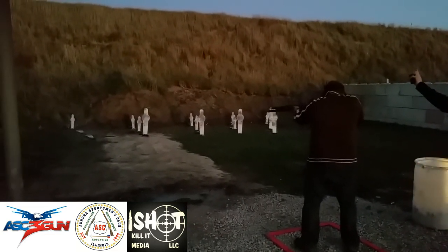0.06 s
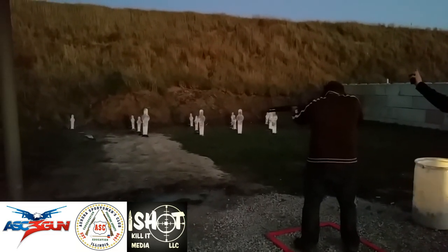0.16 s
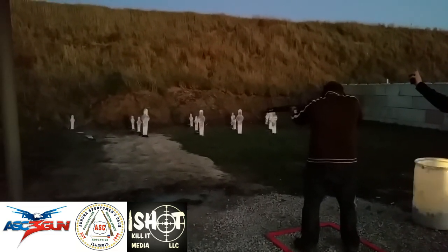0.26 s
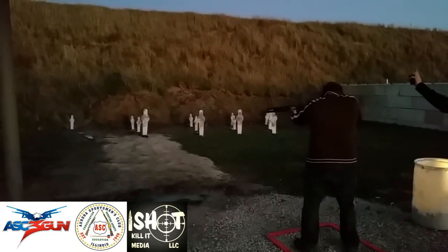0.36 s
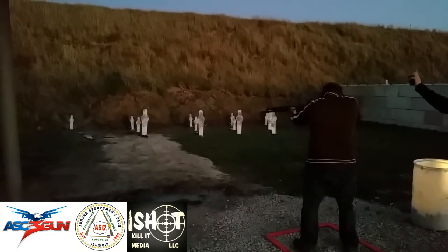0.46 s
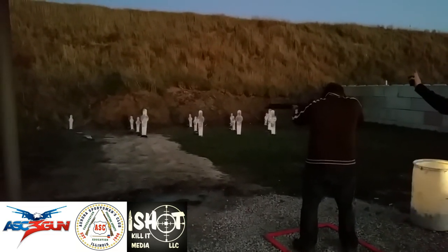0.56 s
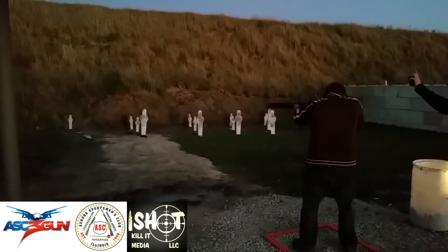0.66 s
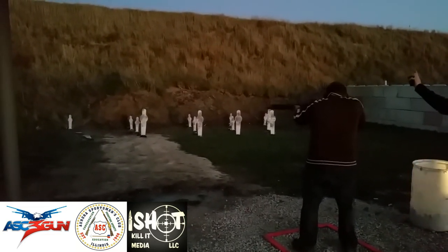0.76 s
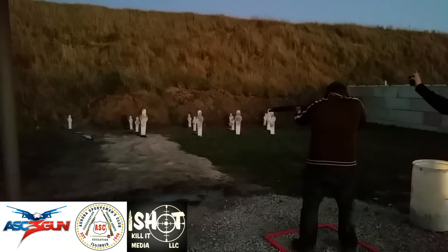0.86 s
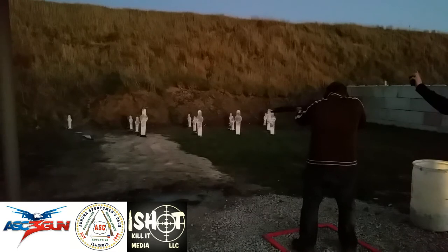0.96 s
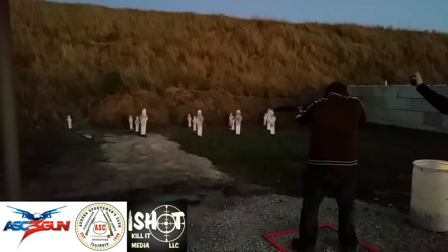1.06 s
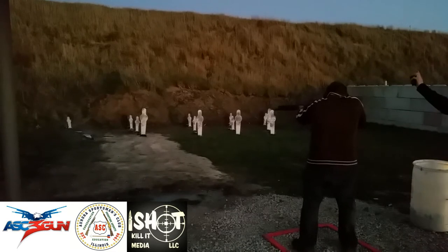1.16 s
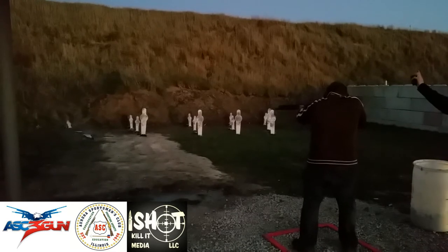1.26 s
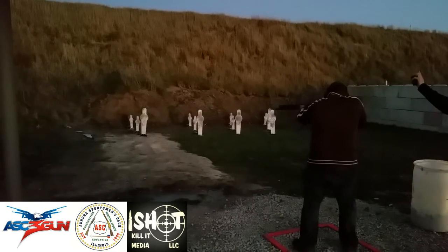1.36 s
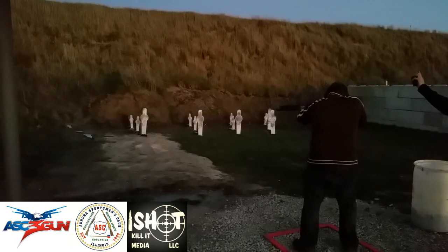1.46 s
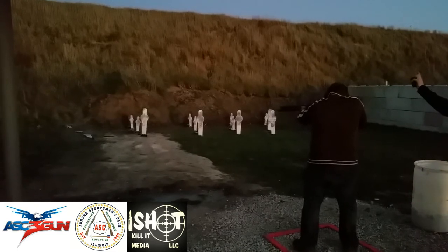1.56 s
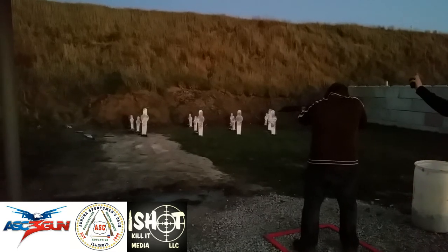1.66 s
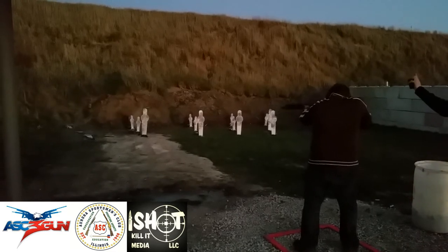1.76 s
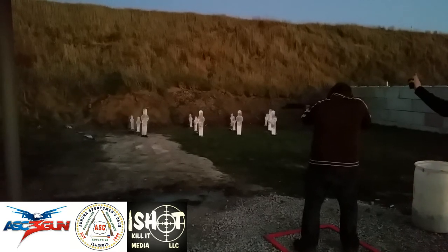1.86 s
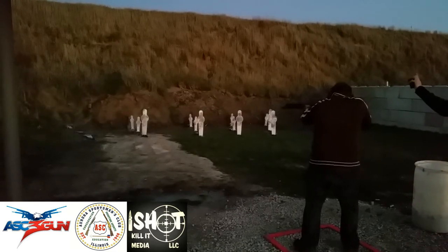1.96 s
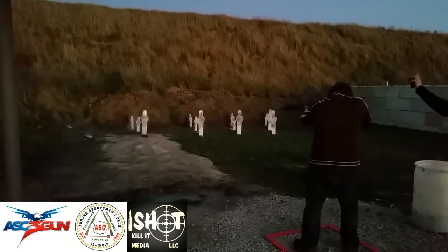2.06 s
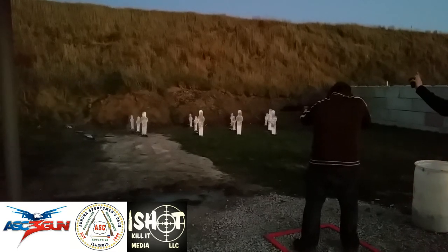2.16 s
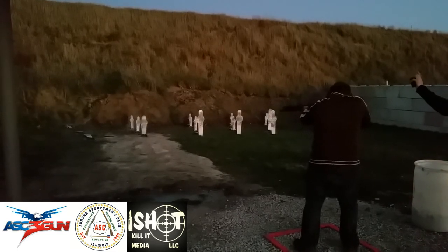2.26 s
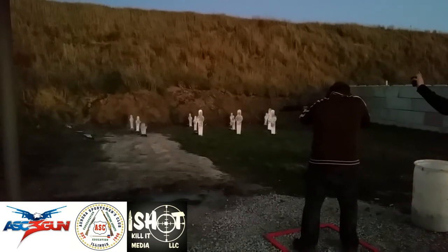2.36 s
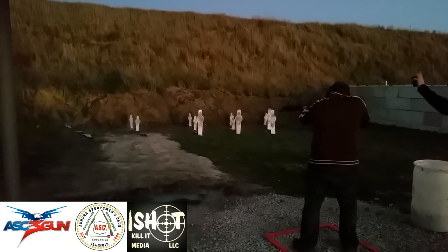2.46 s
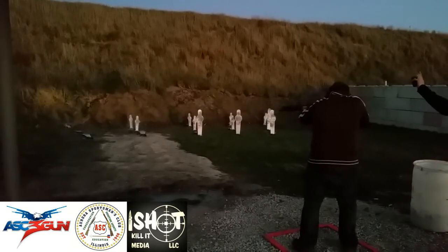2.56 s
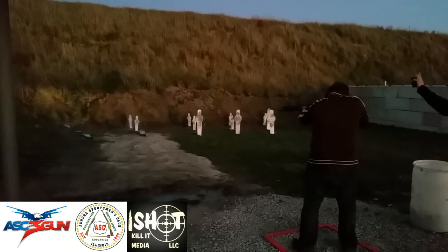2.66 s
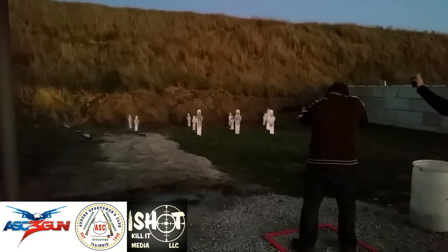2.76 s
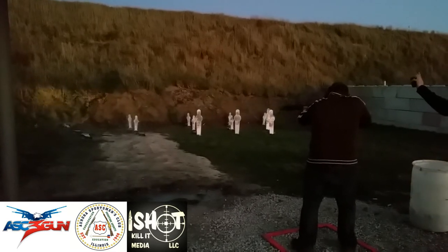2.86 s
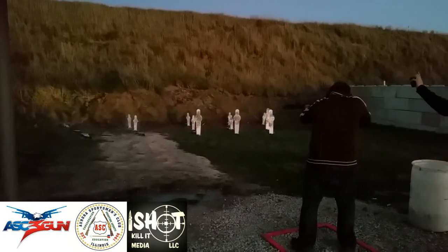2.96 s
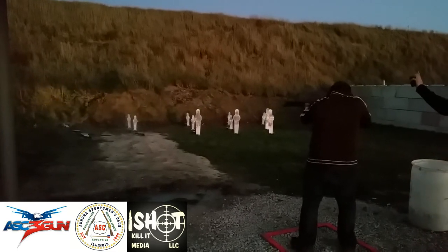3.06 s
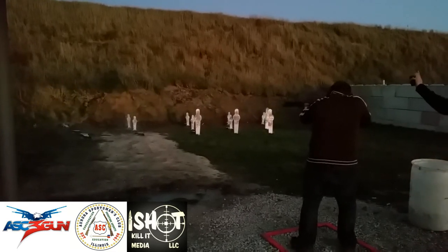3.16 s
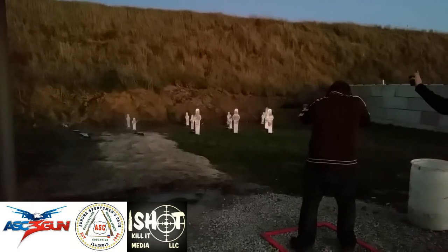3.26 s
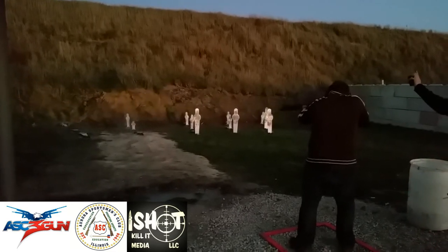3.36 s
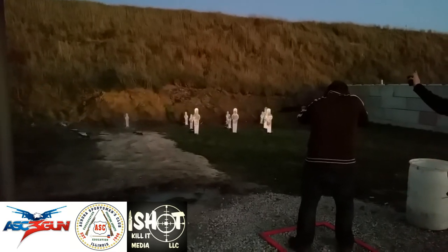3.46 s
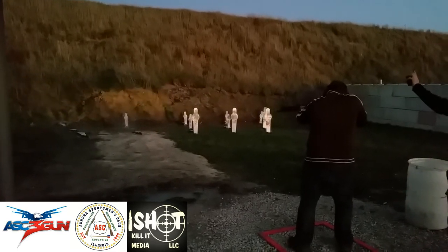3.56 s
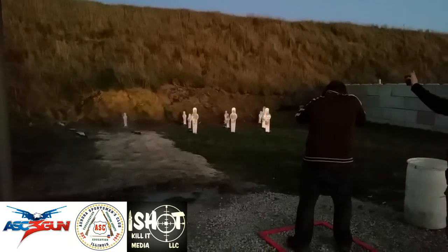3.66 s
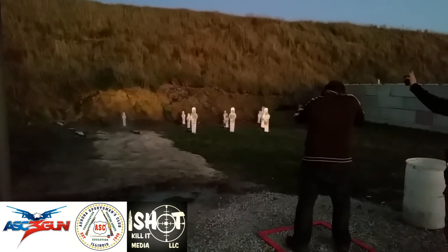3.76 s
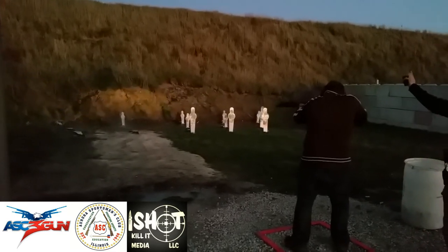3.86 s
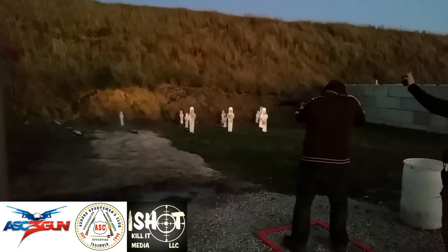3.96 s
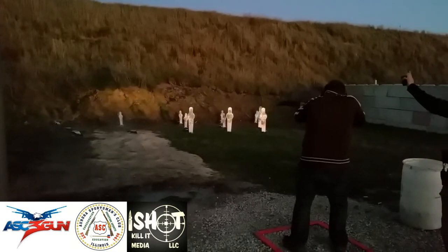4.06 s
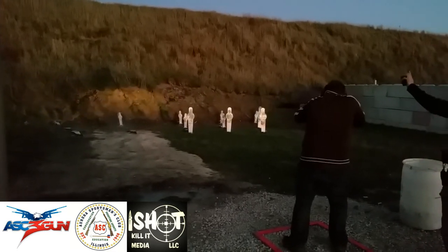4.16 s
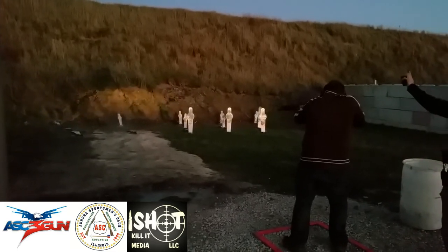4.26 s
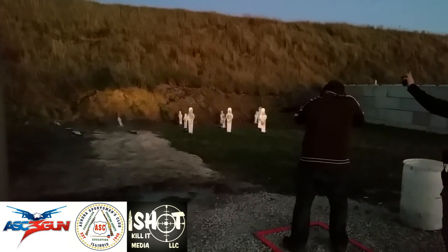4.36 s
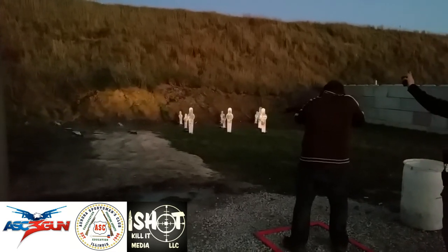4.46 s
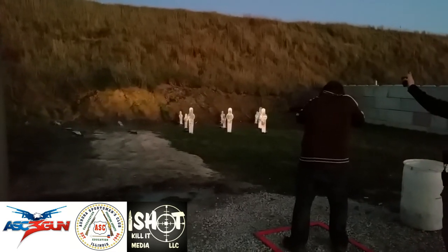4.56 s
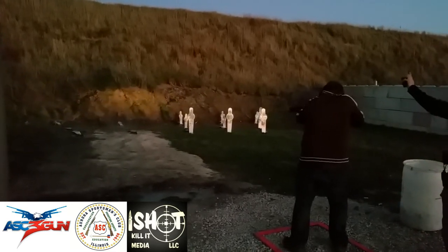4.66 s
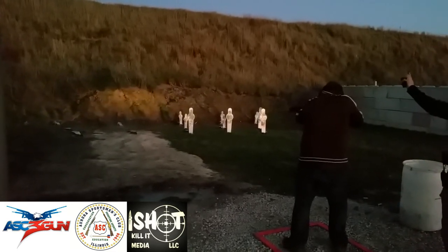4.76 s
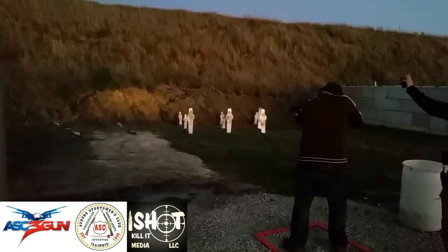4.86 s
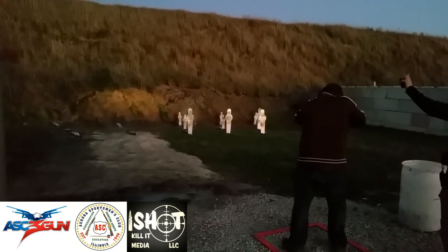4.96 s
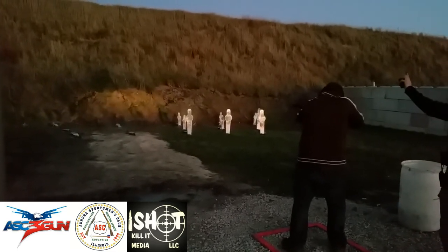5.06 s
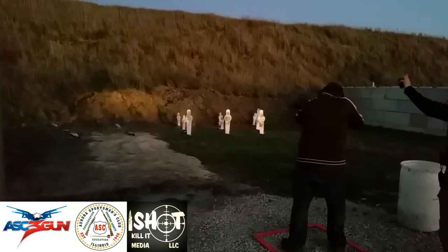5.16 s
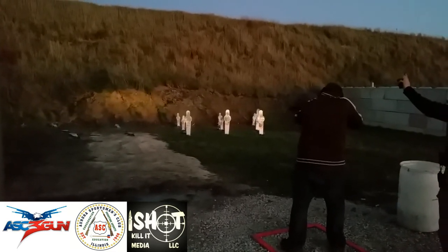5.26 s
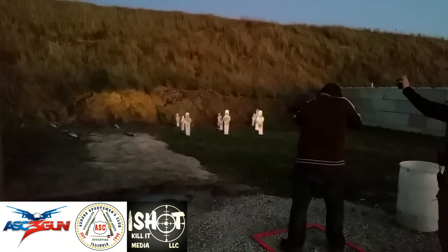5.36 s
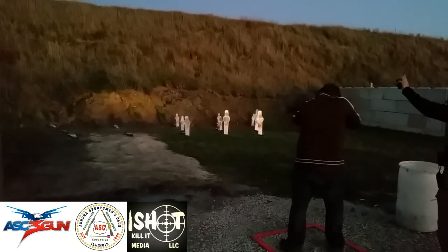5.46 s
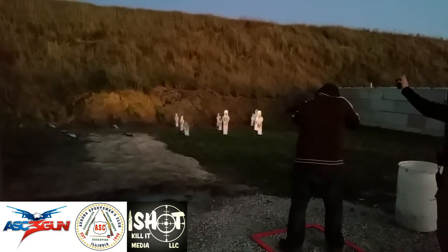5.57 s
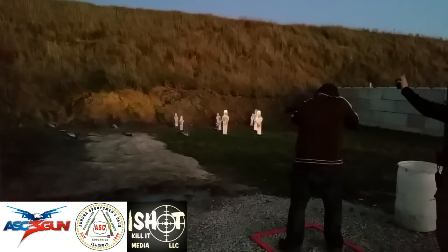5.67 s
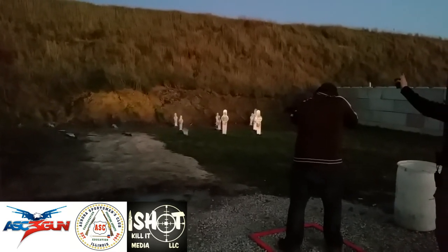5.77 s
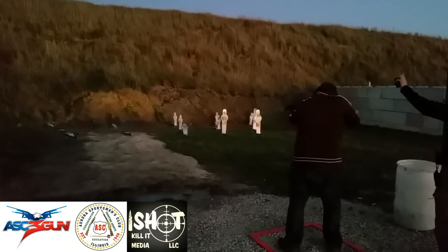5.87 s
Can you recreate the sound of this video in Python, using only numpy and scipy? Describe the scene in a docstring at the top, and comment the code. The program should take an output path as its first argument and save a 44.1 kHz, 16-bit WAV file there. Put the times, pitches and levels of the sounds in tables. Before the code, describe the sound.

Five heavy, evenly spaced shotgun blasts crack and roar between earth banks outdoors, steel targets clanking as they topple, over faint hiss and engine drone.

```python
"""Outdoor hiss and a small engine's drone are heard first, with steel clanking; both swell before the first shot.
A semi-automatic shotgun then fires five times in a bay between earth banks and a block wall.
Each blast is an oscillating pressure pulse followed by a roar of scattered reflections, treble returns and slaps.
Steel plates topple and clank as decaying modes; the hiss is coloured noise and the drone a harmonic series."""
import sys
import numpy as np
from scipy import signal
from scipy.io import wavfile
from scipy.ndimage import uniform_filter1d

SR = 44100
rng = np.random.default_rng(int(sys.argv[2]) if len(sys.argv) > 2 else 0)


def dump(signal):
    """Clip the signal to [-1, 1] and save it as 16-bit WAV at the path in sys.argv[1]."""
    limited = np.clip(np.atleast_2d(signal).T, -1, 1)
    pcm = np.round(limited * 32767).astype(np.int16)
    wavfile.write(sys.argv[1], SR, pcm)


N = 261513  # samples

# Likeness of the two channels in reflected sound. Each row: frequency in Hz, shared part from -1 to 1.
REFLECTED_SAME = [(60, 0.54), (130, .55), (290, 0.47), (640, 0.54), (1400, 0), (5000, 0), (15000, 0.015)]
# Tilt of reflected sound between the channels. Each row: frequency in Hz, left over right in dB.
REFLECTED_LEFT = [(60, 4), (150, 0), (380, 2), (950, -1), (2380, 7), (5980, -5.5), (15000, 4.5)]


def gain_of(db):
    """The decibel is logarithmic: 20 dB is a factor of ten in amplitude."""
    return 10 ** (np.asarray(db) / 20)


def evened(x):
    """Normalizes by the root mean square, so that mean power is 1."""
    return x / np.sqrt(np.mean(x ** 2) + 1e-20)


def read(points, hz):
    """Interpolates a spectrum table along logarithmic frequency."""
    f, value = np.transpose(points)
    return np.interp(np.log(hz + 1), np.log(f + 1), value)


def add(mix, s, sound):
    """Superposition: sound pressures add, here from time s in seconds."""
    part = mix[:, round(s * SR):][:, :sound.shape[1]]
    part += sound[:, :part.shape[1]]


def panned(db):
    """A level difference places a source: db is left over right, shared equally."""
    return gain_of([[db / 2], [-db / 2]])


def smoothed_grid(bins, frames, bin_size, frame_size):
    """Averaging white noise over neighbours gives patches in frequency and time, of rms 1."""
    grid = rng.standard_normal((bins, frames))
    grid = uniform_filter1d(grid, size=bin_size, axis=0)
    return evened(uniform_filter1d(grid, size=frame_size, axis=1))


def shaped(pair, field_db, same, size):
    """Short-time filtering by field_db(Hz, s); mixing unrelated channels sets their coherence."""
    hz, t, z = signal.stft(pair, SR, nperseg=size, noverlap=size * 3 // 4)
    c = np.clip(read(same, hz), -1, 1)[:, None]
    right = c * z[0] + np.sqrt(1 - c ** 2) * z[1]
    z = np.array([z[0], right]) * gain_of(field_db(hz[:, None], t))
    return signal.istft(z, SR, nperseg=size, noverlap=size * 3 // 4)[1][:, :pair.shape[1]]


def noise(colour, size, frame_size=128, loss_db=0):
    """Filtered noise of rms 1; absorption above 12.5 kHz grows to loss_db a second at 25 kHz."""
    lean = np.array([.5, -.5])[:, None, None]

    def field_db(hz, at):
        absorbed = loss_db * at * np.clip(hz / 12500 - 1, 0, 1)
        return read(colour, hz) + lean * read(REFLECTED_LEFT, hz) - absorbed
    white = rng.standard_normal((2, size))
    return evened(shaped(white, field_db, REFLECTED_SAME, size=frame_size))


def field():
    """Broadband noise: outdoor hiss with a fixed spectrum and faint drifting patches."""
    # Spectrum of the hiss. Each row: frequency in Hz, relative level in dB per Hz.
    hiss_colour = [(20, -4.5), (60, 0), (110, 4.5), (180, 1), (250, 0), (330, -2.5), (450, -3), (740, -6.5),
                   (1060, -9.5), (1530, -4.5), (1910, -8), (3250, -13.5), (3840, -21.5), (7000, -25),
                   (8500, -41), (10300, -31.5), (11500, -47.5), (16000, -54.5)]
    # Likeness of the channels. Each row: frequency in Hz, shared part from -1 to 1.
    hiss_same = [(60, 0.97), (130, 1), (290, 0.83), (640, 0.25), (1410, -0.57), (3100, -0.021),
                 (6820, -0.029), (15000, 0.16)]
    level_db, patch_db = -51, 1.1  # rms before panning; rms depth of the patches
    patches = smoothed_grid(513, N // 256 + 9, bin_size=10, frame_size=12)

    def colour_db(hz, at):
        return read(hiss_colour, hz) + patch_db * patches[:, :len(at)]
    hiss = shaped(rng.standard_normal((2, N)), colour_db, hiss_same, size=1024)
    return gain_of(level_db) * evened(hiss) * panned(0.71)


def engine():
    """Periodic firing makes a harmonic series, each partial wavering a little in level."""
    # Each row: multiple of the firing rate, mean level in dB rms before panning.
    orders = [(1, -64.5), (2, -60.5), (3, -45.5), (4, -58.5), (5, -62.5), (6, -71), (7, -67), (8, -70.5)]
    firing_hz, waver_db = 34.6, 0.71
    turns = firing_hz * np.arange(N) / SR
    out = np.zeros((2, N))
    for k, db in orders:
        waver = uniform_filter1d(rng.standard_normal(N), size=3000)
        waver = evened(uniform_filter1d(waver, size=3000))
        lag = np.array([[0], [-.0075 * k]])  # in cycles: the drone reaches the right a little later
        tone = np.sin(2 * np.pi * (round(k) * turns + rng.random() + lag))
        out += np.sqrt(2) * gain_of(db + waver_db * waver) * tone
    return out * panned(0.65)


def ringing(modes, t, t60):
    """Modal synthesis: a fading patter of grains excites damped modes; rms 1 over the first 50 ms."""
    struck = rng.standard_normal((2, len(t))) * (rng.random(len(t)) < 900 / SR)  # 900 grains a second
    grains = struck * gain_of(-60 * t / max(t60, .02))
    grains[:, 0] = 0.56  # first strike
    grains[1] = 0.37 * grains[0] + 1.9 * grains[1]  # the right shares part of the left's grains
    response = 0
    for hz, width, db in modes:
        decay = np.exp(-np.pi * width * t)  # a wider resonance dies sooner
        response = response + gain_of(db) * np.sqrt(width) * decay * np.sin(2 * np.pi * hz * t)
    ring = signal.fftconvolve(grains, response[None], axes=1)[:, :len(t)]
    return ring / np.sqrt(np.mean(ring[:, :2205] ** 2) + 1e-20)


def clank(knock_db, thud_db, rattle_db, ring_db, ring_hz, t60, pan_db):
    """Impact excitation: a hollow knock and ground thud, then a rattle and the modes near ring_hz."""
    # Modes of the plates. Each row: frequency in Hz, width in Hz, relative level in dB.
    steel = [(887, 35, 5), (950, 37, 0), (1144, 17, -2.5), (1473, 22, 3), (1640, 25, -0.5),
             (1820, 53, -3.5), (1950, 40, -2), (2210, 77, -10), (2500, 80, -8), (2920, 50, -7.5),
             (3540, 35, -3), (3660, 35, -6), (4150, 180, -10.5), (6200, 280, -10.5)]
    # Spectrum of a rattle. Each row: frequency in Hz, relative level in dB per Hz.
    rattle_colour = [(150, -25), (400, -6), (900, -2.5), (1800, 1.5), (3200, -5.5), (4500, -9.5),
                     (6500, -14), (9000, -26), (16000, -30)]
    narrow_db = 34  # modes weaken by this for each octave from ring_hz
    t = np.arange(22000) / SR
    knock_hz = rng.uniform(821.2, 867.1)
    knock = gain_of(knock_db - 60 * t / 0.037) * np.sin(2 * np.pi * knock_hz * t)
    thud = gain_of(thud_db - 60 * t / 0.028) * np.sin(2 * np.pi * 300 * t)
    impact = (knock + thud) * np.minimum(t / 0.00075, 1)

    # High rings rattle brightly: 3 dB of treble slope for each octave above 1400 Hz.
    treble_db = 3 * np.log2(ring_hz / 1400)
    colour = [(hz, db + treble_db * np.log2(1 + (hz / 3000) ** 2) / 2) for hz, db in rattle_colour]
    rattle = noise(colour, size=len(t), frame_size=256) * gain_of(rattle_db - 60 * t / max(t60, .02))
    rattle = rattle * (1 - np.exp(-t / 0.00062))

    modes = [(hz, width, db - narrow_db * abs(np.log2(hz / ring_hz))) for hz, width, db in steel]
    ring = gain_of(ring_db) * ringing(modes, t, t60)
    return (impact + rattle + ring) * panned(pan_db)


def slap(db, length, pan_db):
    """A transient of broadband treble: a fast rise and a Gaussian cut-off within milliseconds."""
    # Each row: frequency in Hz, relative level in dB per Hz.
    slap_colour = [(800, -27.5), (3000, 2.5), (6500, -1.5), (8000, -10.5), (12000, -9.5), (16000, -18.5)]
    t = np.arange(2000) / SR
    shape = (1 - np.exp(-t / 0.0013)) * np.exp(-(t / max(length, .001)) ** 2)
    return noise(slap_colour, size=len(t)) * gain_of(db - 4.5) * shape * panned(pan_db)


def swing(db, hz, cycles):
    """A pressure pulse as a windowed cosine: a push, a deeper pull near 4 ms and a rebound."""
    u = (np.arange(600) / SR - .004) * hz  # cycles from the centre
    return -gain_of(db) * np.cos(2 * np.pi * u - .2) * np.exp(-(u / cycles) ** 2) * np.ones((2, 1))


def boom(db, hz, side):
    """Specular reflection: one low return from a bank, nearer channel earlier and louder."""
    pulse = swing(db, hz, cycles=0.95)
    right = np.roll(pulse[1], round(side * 30))  # delay in samples
    return np.array([pulse[0], right]) * panned(7 * side)


def treble_gain(t):
    """Incoherent returns add in power; each holds briefly and decays exponentially."""
    # Ground scatter, the wall and three banks.
    # Each row: delay after the blast in seconds, relative level in dB, hold in seconds, t60 in seconds.
    returns = [(.001, -14.5, 0.026, 0.082), (0.057, -21.5, 0.015, 0.064), (0.082, -36, 0.051, 0.2),
               (0.191, -41, .026, .09), (0.258, -48.5, .004, .03)]
    power = 0
    for s, db, hold, t60 in returns:
        decay_db = 120 * np.maximum(t - s - hold, 0) / t60
        rise = np.clip((t - s) / 0.0012, 0, 1)
        power = power + gain_of(2 * db - decay_db) * rise ** 2
    return np.sqrt(power)


def roar_level_db(t, hold_s):
    """Energy decay: a sag while the banks answer, a quick drop after the farthest, then a slower death."""
    sag_db, knee_db = -5, -26.5
    drop_db_per_s, die_db_per_s = 180.5, 139
    knee_s = hold_s + (sag_db - knee_db) / drop_db_per_s
    level_db = np.interp(t, [0, hold_s, knee_s], [0, sag_db, knee_db])
    level_db = level_db - die_db_per_s * np.maximum(t - knee_s, 0)
    wall_gap_db = -0.5 * np.exp(-((t - .052) / .008) ** 2)  # thins just before the wall answers
    far_swell_db = 1.5 * np.exp(-((t - hold_s) / 0.024) ** 2)  # the farthest bank answers
    return level_db + wall_gap_db + far_swell_db


def roar(db, hold_s, returns_per_s=6000, spread_db=1.0):
    """Diffuse scattering: uneven reflections, duller until the farthest bank answers, then a little brighter."""
    # Spectra of the first and the late returns. Each row: frequency in Hz, relative level in dB per Hz.
    near_colour = [(35, -48.5), (60, -17), (139, 6.5), (469, -3), (1010, 1.5), (1740, 6), (2000, 6),
                   (4750, -10.5), (6430, -9.5), (7750, -26), (12700, -22.5), (16000, -26.5)]
    far_colour = [(35, -42.5), (60, -12.5), (113, 10), (193, -4), (380, 7), (715, 1.5), (862, 1),
                  (1470, -20.5), (1950, -12.5), (2650, -19.5), (5460, -28.5), (16000, -62)]
    # Dullness is the share of the late spectrum, 0 to 1.
    dull_first, dull_farthest, dull_last, dull_bend = 0.18, 0.66, 0.44, 1.9
    lumpy_db = 2  # rms depth of the patches
    t = np.arange(21000) / SR
    taps = rng.standard_normal((2, len(t))) * (rng.random((2, len(t))) < returns_per_s / SR)
    taps = taps * gain_of(spread_db * np.minimum(rng.exponential(1, taps.shape), 4))
    lumps = smoothed_grid(257, len(t) // 128 + 9, bin_size=5, frame_size=5)

    def levelled(points, hz):
        curve_db = read(points, hz)
        return curve_db - 10 * np.log10(np.mean(gain_of(2 * curve_db)))

    def colour_db(hz, at):
        growing = dull_first + (dull_farthest - dull_first) * (at / hold_s) ** dull_bend
        easing = np.interp(at, [hold_s, t[-1]], [dull_farthest, dull_last])
        share = np.where(at < hold_s, growing, easing)
        blend_db = (1 - share) * levelled(near_colour, hz) + share * levelled(far_colour, hz)
        lean = read(REFLECTED_LEFT, hz) / 2
        return blend_db + lumpy_db * lumps[:, :len(at)] + np.array([lean, -lean])
    sound = shaped(taps, colour_db, REFLECTED_SAME, size=512)
    fade = np.clip((t[-1] - t) / 0.034, 0, 1) * np.clip(t / 0.00033, 0, 1)
    return evened(sound) * gain_of(db + roar_level_db(t, hold_s)) * fade


def blast(db, hz, hiss_db, roar_db, plate_db, hold_s):
    """Direct sound precedes reflections: crack, pressure swing, then roar, treble, slaps, booms and tail."""
    # Treble spectrum. Each row: frequency in Hz, relative level in dB per Hz.
    treble_colour = [(800, -28.5), (3000, 3), (6500, -3), (7800, -10), (10000, -9), (13000, -5.5),
                     (16000, -8.5)]
    # Spectrum of the last echoes. Each row: frequency in Hz, relative level in dB per Hz.
    tail_colour = [(35, -49.5), (88, -27.5), (150, 4.5), (561, -6), (655, -12.5), (1460, -18), (1890, -6),
                   (4380, -26.5), (7330, -30), (9000, -51.5), (11700, -77.5), (19800, -120)]
    # Clacks of the opening bolt and hard echoes.
    # Each row: delay after the blast in seconds, mean level setting in dB, length in seconds, left over right in dB.
    bolt_slaps = [(.0605, -5.5, 0.005, 2), (0.077, -9.5, .004, 4)]
    # Single strong returns from the banks; pulse centres fall about 2 ms after the listed delay.
    # Each row: delay in seconds, mean level before panning in dB, frequency in Hz, side from -1 right to 1 left.
    bank_booms = [(.024, -10.5, 366, 0), (.038, -11.5, 370, -.3), (0.067, -13.5, 390, 0.27),
                  (.118, -10, 200, -.3), (.156, -9, 605, -0.16)]
    uneven_db, uneven_s = 1.5, .002  # greatest random change, either way
    t = np.arange(30000) / SR - .004  # zero at the centre of the swing
    treble = noise(treble_colour, size=len(t), loss_db=248.5) * gain_of(hiss_db) * treble_gain(t)
    tail = noise(tail_colour, size=len(t), frame_size=1900)
    tail = tail * gain_of(-29.0 - 60 * t / 0.93) * np.clip(t / 0.11, 0, 1)
    crack = np.sin(2 * np.pi * 2500 * t) * np.exp(-((t + .0014) / .0007) ** 2)  # ahead of the swing
    crack = gain_of(db - 17.) * crack * panned(5.)
    # A struck plate: one mode at 1865 Hz, silent for 29 ms and then fading in.
    plate = ringing([(1865, 15, 0)], np.maximum(t, 0), t60=0.71) * np.clip(t / 0.029 - 1, 0, 1)
    out = treble + tail + crack + gain_of(plate_db - 2.0) * plate
    add(out, 0, swing(db, hz, cycles=.7))
    add(out, .0045, roar(roar_db, hold_s))
    for s, slap_db, length, pan_db in bolt_slaps:
        add(out, s + .004, slap(slap_db + uneven_db * rng.uniform(-1, 1), length, pan_db))
    for s, boom_db, boom_hz, side in bank_booms:
        louder, later = rng.uniform(-1, 1, size=2)
        add(out, s + .002 + uneven_s * later, boom(boom_db + uneven_db * louder, boom_hz, side))
    return out


def scene():
    """Superposes shots, bolt and steel; the background sinks by up to 9 dB where these are loud."""
    # Shots. Each row: centre of the pull in seconds, swing level in dB, swing frequency in Hz,
    # relative treble level in dB, roar level in dB, plate ring setting in dB, hold of the roar in seconds.
    shots = [(0.6807, 2, 1450, 2, -10, -26, 0.17), (1.8889, -1.5, 1480, -1, -11, -40, 0.17),
             (3.0313, -2, 1405, -0.5, -11, -27, 0.17), (4.0133, -3, 1394, 0, -11, -30, 0.17),
             (5.1102, -2.5, 1090, -1.5, -10, -36.5, 0.16)]
    # Later clacks of the bolt.
    # Each row: start in seconds, level setting in dB, length in seconds, left over right in dB.
    bolt_clacks = [(.7734, -4.5, 0.0036, -3), (.782, -6.5, 0.0026, -10), (.822, -12, 0.0051, -4),
                   (1.976, -12.5, 0.0044, -1), (1.998, -8, 0.0033, -4), (3.119, -11, .007, -3),
                   (3.150, -7.5, .0055, -2), (4.102, -9.5, 0.0083, 0), (4.145, -9, 0.0054, 1),
                   (5.212, -12, 0.0089, 1)]
    # Toppling steel. Each row: start in seconds, knock, thud, rattle and ring levels in dB before panning,
    # centre of the ring in Hz, t60 in seconds, left over right in dB.
    steel_clanks = [(.045, -25, -24, -43.5, -39, 880, 0.25, .5), (.062, -42, -55, -49, -57, 6200, 1, -3),
                    (.089, -46, -47, -42.5, -48, 1150, 0.65, 1), (.102, -65, -65, -62, -55, 4100, .08, 0),
                    (.107, -60, -62, -55, -52, 1470, .15, 2), (.122, -60, -60, -60, -48, 1830, .35, 2),
                    (.158, -58, -55, -58.5, -48, 1550, 1, 2.5),
                    (.399, -48, -38, -46.5, -47, 1300, 0.97, 0.5),
                    (0.426, -51, -55, -60, -53.5, 6200, 0.3, 2), (.445, -42, -37, -40, -44, 1150, .3, 1),
                    (.485, -60, -60, -53, -43, 1700, 0.23, -1), (1.442, -59, -46, -42, -74, 4200, 0.18, -3),
                    (1.589, -43, -38, -51, -65, 2500, .2, -1.5),
                    (1.616, -42, -31.5, -38, -47, 1000, 0.17, -4.5),
                    (1.664, -50, -50, -46, -64, 1300, .19, 4.5), (2.560, -62, -62, -61, -61, 1400, .12, -3),
                    (2.563, -65, -65, -59, -63, 4200, .04, 3),
                    (2.694, -33, -29.5, -41, -38, 1100, 0.4, 3.5),
                    (2.71, -27, -48, -58, -46.5, 850, 0.27, 1.5),
                    (2.744, -35, -28, -46.5, -50, 3680, 0.43, 1),
                    (2.755, -60, -60, -57, -48.5, 840, .9, 2.5), (2.762, -60, -58, -61, -46, 1490, .7, 3),
                    (2.819, -45, -40, -45.5, -51.5, 900, 0.46, 2),
                    (3.741, -27, -26.5, -38, -50, 1900, 0.67, 0),
                    (3.759, -44, -60, -51.5, -46.5, 3500, 0.53, 6),
                    (3.838, -65, -65, -62, -63, 3520, .35, 6.5),
                    (3.947, -35, -40, -49.5, -53.5, 2800, .23, -2),
                    (3.973, -43, -48.5, -46.5, -52, 3500, .25, 4.5),
                    (4.714, -35.5, -46, -36, -61, 3600, 0.098, -1), (4.73, -35, -56, -44, -52, 940, 0.3, 0),
                    (4.737, -60, -62, -50, -49.5, 1890, 0.37, 5), (4.93, -54, -58, -51, -70, 2500, .06, -2),
                    (5.92, -39.5, -40, -42.5, -50, 1200, .3, 0)]
    # Common swell of drone and hiss. Each row: time in seconds, gain in dB.
    swell = [(0, 1.5), (.2, 2), (.35, 5.5), (.5, 9.5), (.62, 15.5), (.68, 11.5), (0.751, 3), (1.2, 1.5),
             (5.93, 1)]
    mix = np.zeros((2, N))
    for s, *columns in shots:
        add(mix, s - .004, blast(*columns))
    for s, *columns in bolt_clacks:
        add(mix, s, slap(*columns))
    for s, *columns in steel_clanks:
        add(mix, s, clank(*columns))
    power = abs(uniform_filter1d((mix ** 2).mean(0), size=1500))
    loud_db = 10 * np.log10(power + 1e-12)
    sunk_db = np.clip(2.0 * (loud_db + 33.0), 0, 9.)
    swell_db = np.interp(np.arange(N) / SR, *np.transpose(swell))
    background = (engine() + field()) * gain_of(swell_db)
    return mix + background / gain_of(sunk_db)


def record(dry):
    """Saturation of the input stage rounds off peaks; a low-pass at 16.05 kHz then limits the band."""
    rounded = dry / (1 + (dry / .99) ** 6) ** (1 / 6)
    low_pass = signal.firwin(511, 16050, window=("kaiser", 9), fs=SR)
    return signal.oaconvolve(rounded, low_pass[None], "same")


dry = scene()
out = record(dry)
dump(out)
```